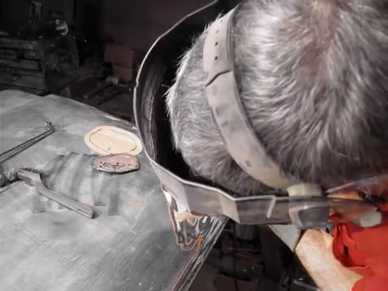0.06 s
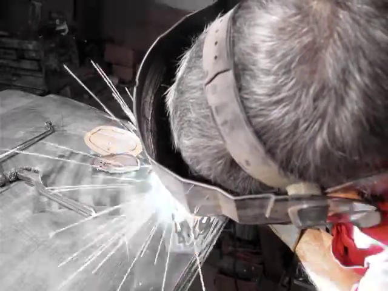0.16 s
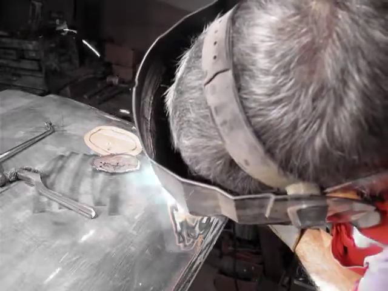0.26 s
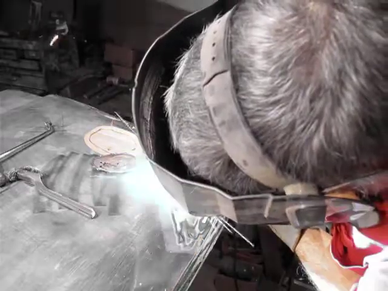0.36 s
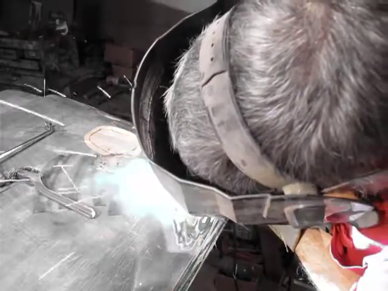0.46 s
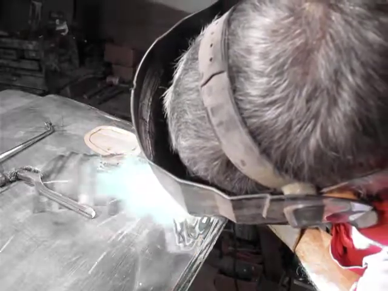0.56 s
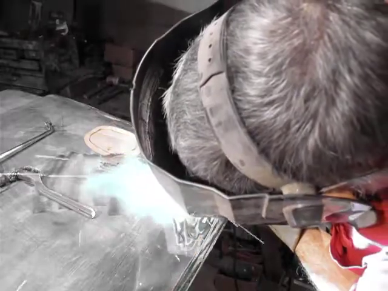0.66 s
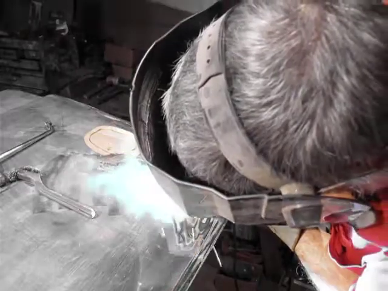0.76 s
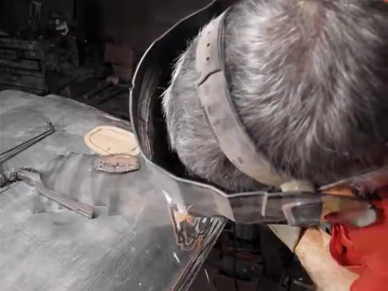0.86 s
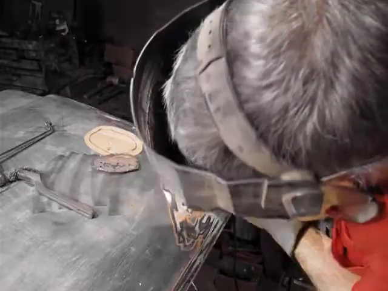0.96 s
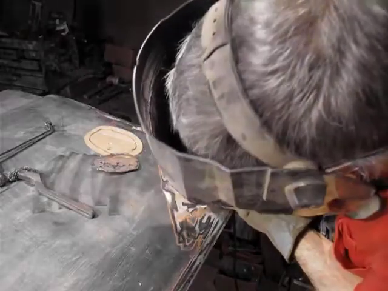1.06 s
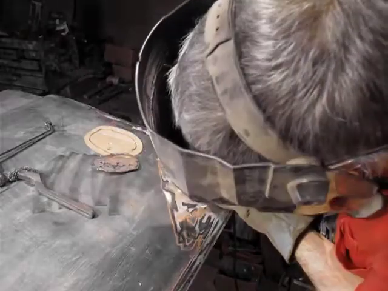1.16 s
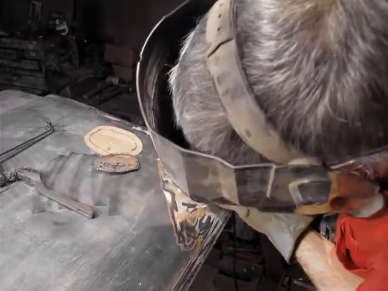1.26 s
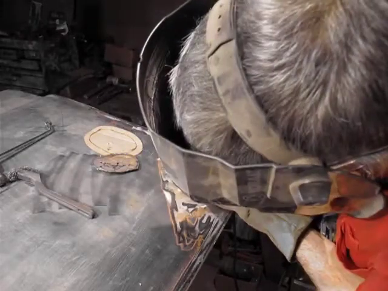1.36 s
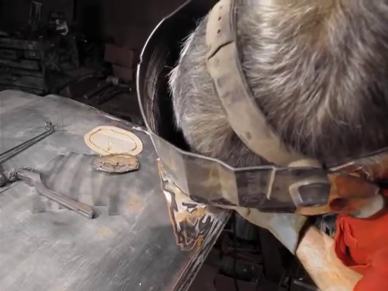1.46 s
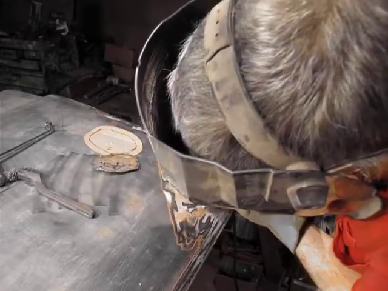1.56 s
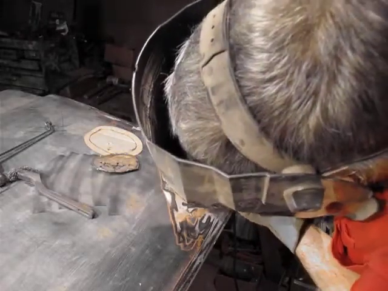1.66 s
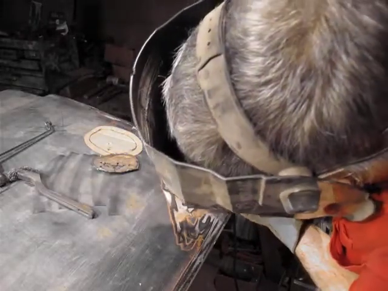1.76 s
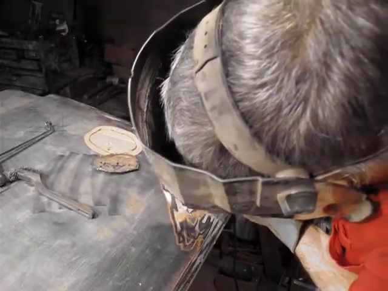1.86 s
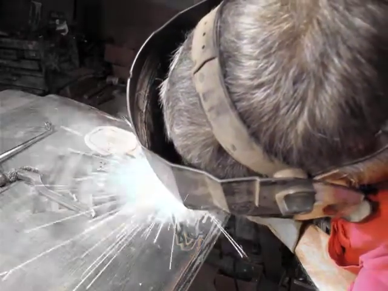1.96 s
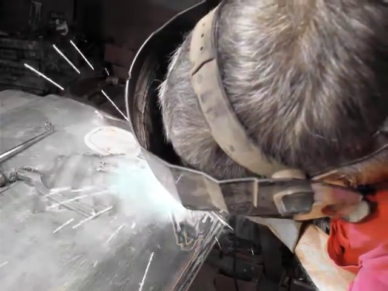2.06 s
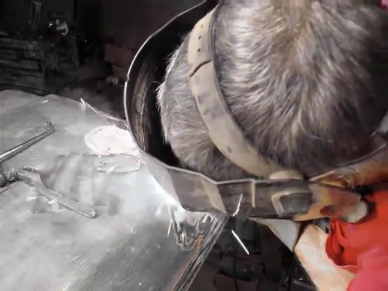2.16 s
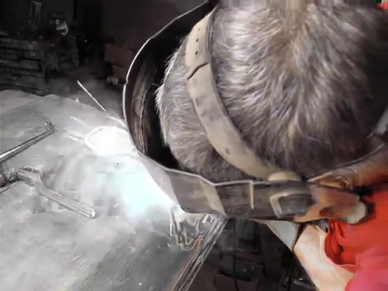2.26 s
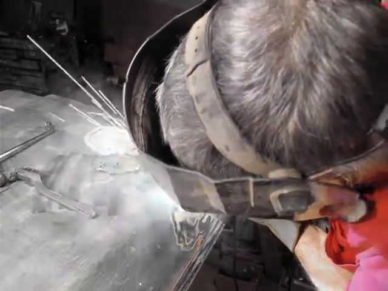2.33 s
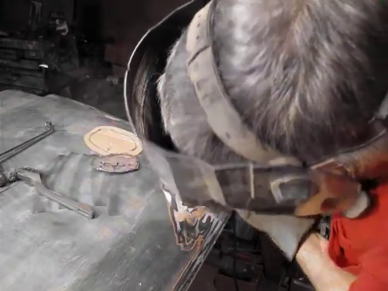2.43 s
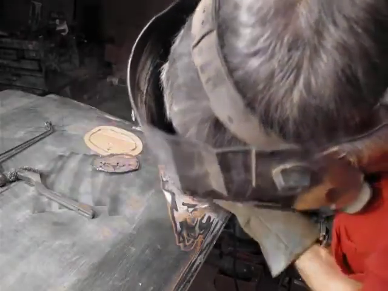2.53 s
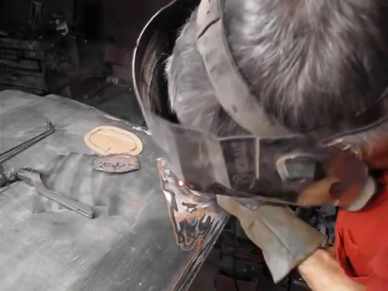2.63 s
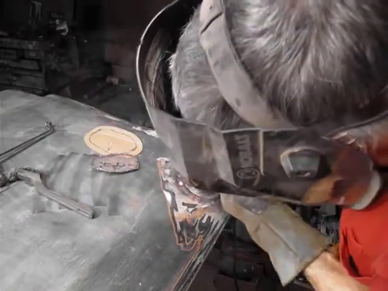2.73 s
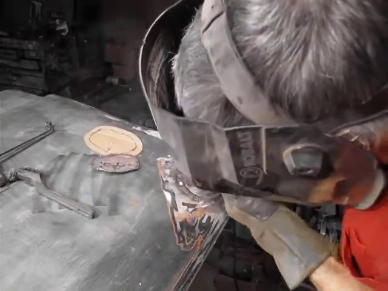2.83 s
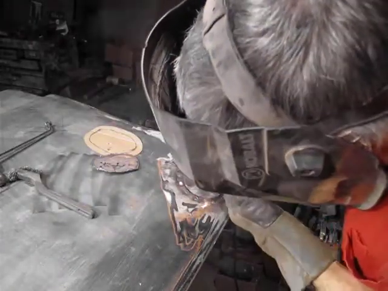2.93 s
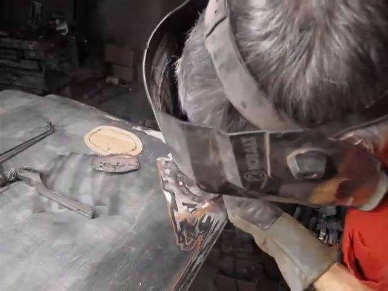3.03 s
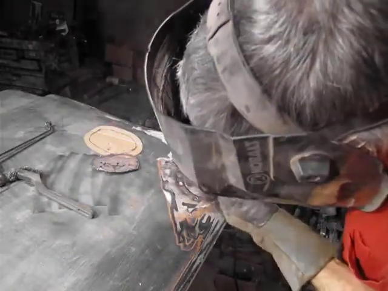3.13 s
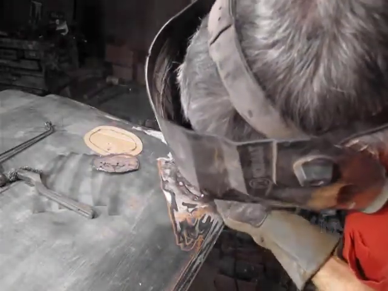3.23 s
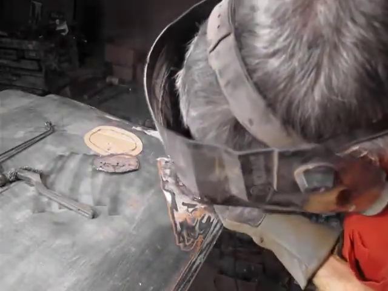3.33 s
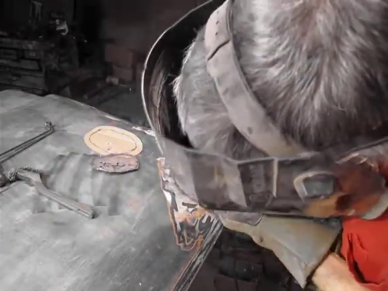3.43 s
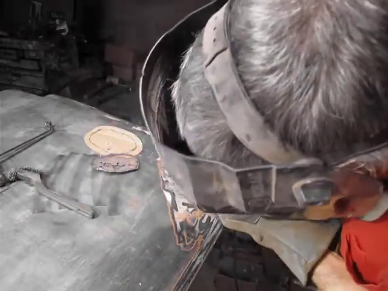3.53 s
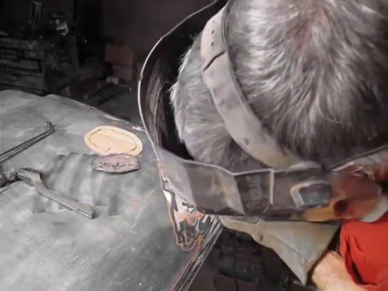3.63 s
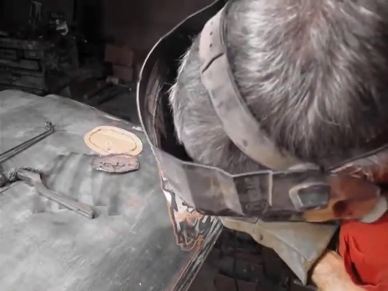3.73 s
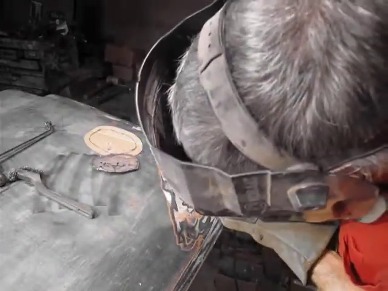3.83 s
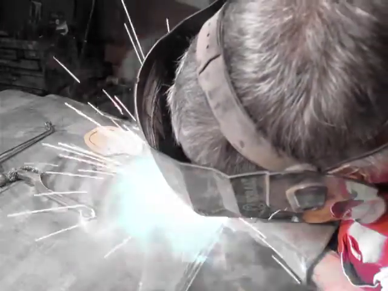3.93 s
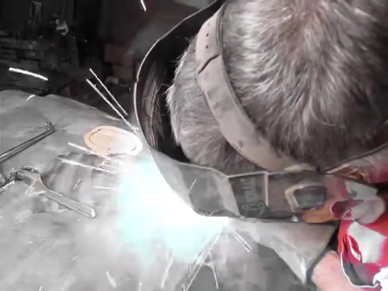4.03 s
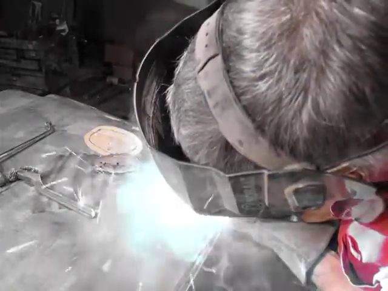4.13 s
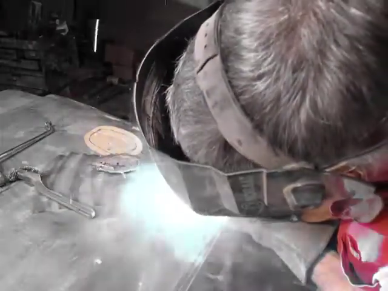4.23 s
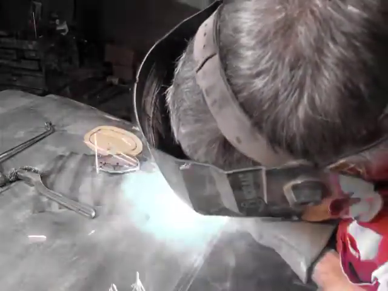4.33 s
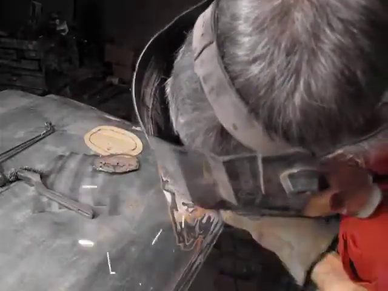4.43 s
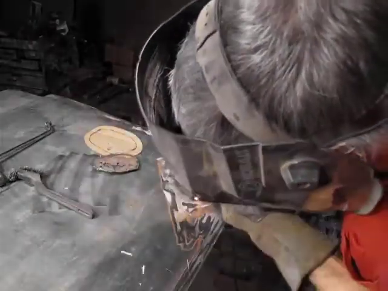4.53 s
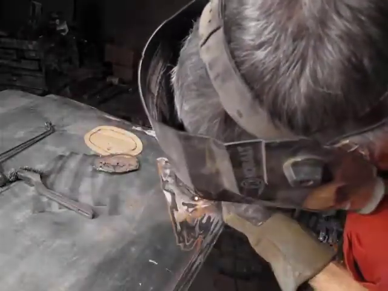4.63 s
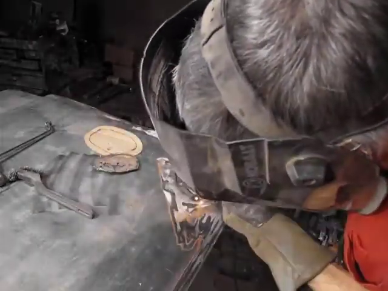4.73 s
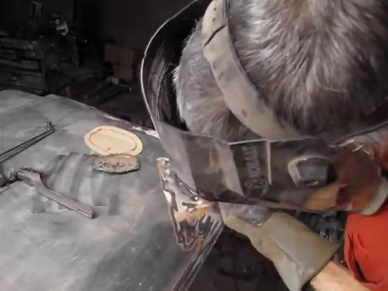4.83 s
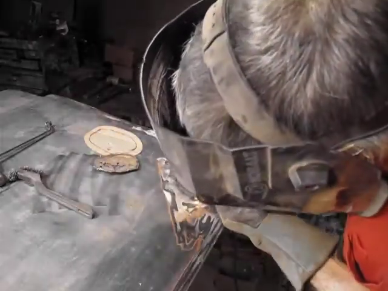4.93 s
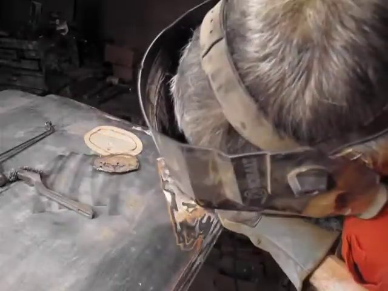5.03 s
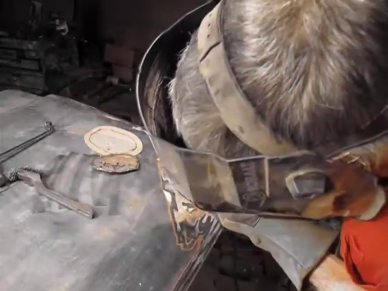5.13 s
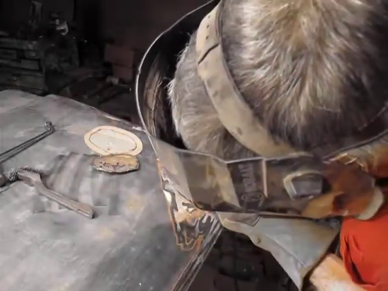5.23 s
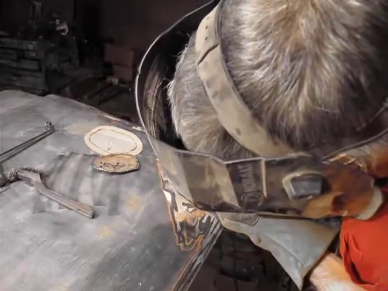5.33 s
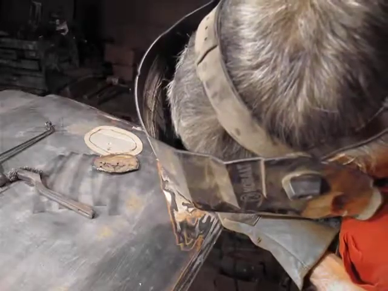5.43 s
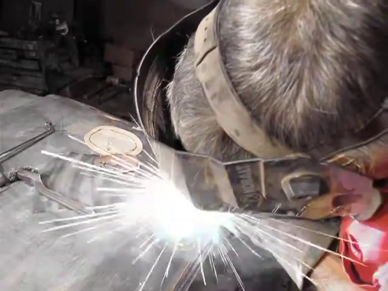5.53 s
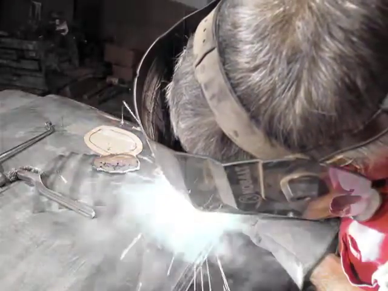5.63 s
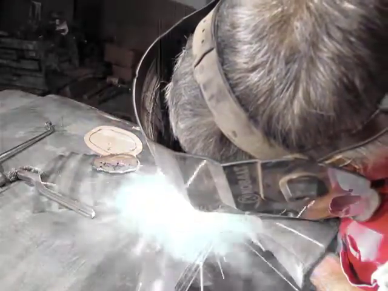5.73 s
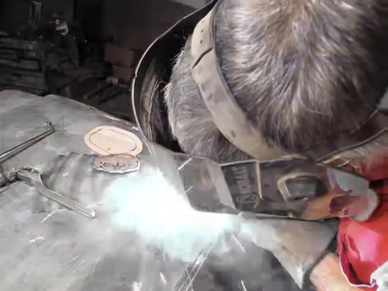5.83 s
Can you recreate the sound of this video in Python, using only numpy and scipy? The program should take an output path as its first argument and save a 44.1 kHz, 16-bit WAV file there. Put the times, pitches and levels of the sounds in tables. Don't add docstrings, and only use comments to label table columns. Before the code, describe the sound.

Arc welding on sheet steel, heard close through a small, bright microphone with automatic gain. The first tack is uneven and stuttering, the second a fast buzzing crackle, the third has heavy, loud cracks with a faint metallic ring, and the last is short. Each starts with a puff of gas and a hard pop; between them a low fan hum fades back up in the reverberant shop.

```python
import sys
import numpy as np
from scipy import signal
from scipy.fft import rfft, irfft
from scipy.io import wavfile
from scipy.ndimage import uniform_filter1d

SR = 44100
rng = np.random.default_rng(int(sys.argv[2]) if len(sys.argv) > 2 else 0)


def waveform_to_disk(signal):
    frames = np.transpose(np.atleast_2d(signal))
    scaled = np.clip(frames, -1, 1) * 32767
    samples = np.round(scaled).astype(np.int16)
    wavfile.write(sys.argv[1], SR, samples)


def gain_from_decibels(decibels):
    exponent = np.asarray(decibels, float) / 20
    return 10 ** exponent


N = 259308
T = np.arange(N) / SR

# f/Hz, width/Hz, level/dB, period/s, on for/s
CHIRPS = [(15640, 250, -74.5, .08405, .058), (12280, 350, -73, .1681, .055)]
# multiple of the blade rate, level/dB
FAN_ORDERS = [(1, -36.5), (2, -58.5), (3, -50.5), (5, -65.5)]
# f/Hz, width/Hz, level/dB
CASE_MODES = [(121, 5.2, -65), (356, 9.1, -57.5), (534, 13, -59), (764, 4.4, -58.5), (813.6, 9.8, -50),
              (998, 18, -54.5), (1055, 3.3, -53.5), (1110, 23, -77), (1197, 12.5, -54), (2760, 430, -60)]
# f/Hz, density/dB per Hz
AIR_SPECTRUM = [(25, -45.5), (80, -41.5), (120, -40), (157, -30), (200, -16.5), (280, -28.5), (425, -23),
                (800, -25.5), (1180, -22.5), (2460, -33.5), (5000, -39.5), (9600, -40), (11200, -48),
                (15000, -68)]
# f/Hz, t60/s
REVERBERATION = [(500, 0.44), (2000, 0.35), (6000, 0.33), (10000, 0.27), (14000, 0.29)]
# f/Hz, gain/dB
DIFFUSE_COLOUR = [(300, -30), (1000, -19.5), (2200, -12.5), (3700, -16.5), (5500, -7.5), (6900, -7),
                  (7800, -8.5), (10200, 3.5), (11400, -8.5), (12500, -17), (15800, -20.5)]
PATH_DELAYS_MS = (0, .29, .68, .97, 2.3, 4.78, 4.99, 5.09, 5.8, 6.06, 15.4)
PATH_SHARES = (1, .65, .28, .2, .08, .8, .6, .32, -.3, .35, .22)
TRIGGERS_S = [
    .1107,
    1.8196,
    3.7867,
    5.4543,
]
# steady arc from t/s, trigger let go t/s, gas puff level/dB, gas flow level/dB, sizzle level/dB
WELDS = [
    (0.334, 0.738, -22.5, -48, -32),
    (1.938, 2.268, -27.5, -32, -30),
    (3.908, 4.218, -25, -33, -37),
    (5.631, 5.9, -25.5, -33, -35),
]
# f/Hz, density/dB per Hz
GAS_SPECTRUM = [(880, -40), (1500, -26), (2100, -18), (2900, -17), (4500, -25), (6140, -29), (6770, -21),
                (7700, -16), (9940, -8.5), (11900, -10.5), (14200, -17), (15800, -25.5)]
# f/Hz, density/dB per Hz
SIZZLE_SPECTRUM = [(800, -29.5), (2000, -7.5), (3700, -18), (5500, -9), (6900, -11.5), (7800, -17),
                   (10200, 2.5), (11400, -6.5), (12500, -15), (15800, -20)]
# f/Hz, width/Hz, level/dB
SHEET_MODES = [(1050, 5, -24)]
# from t/s, to t/s
SHEET_FREE_S = (4.1, 4.3)
STRIKES_S = [
    .1318,
    .2698,
    .3384,
    1.8811,
    1.9323,
    3.8616,
    4.2871,
    5.5094,
    5.6575,
]
# spit level/dB, thump level/dB, blow into the shop level/dB
STRIKE_LEVELS = [(-24, -35, -16), (-14.5, -25, -12), (-17, -11.5, -10), (-17.5, -26, -18),
                 (-20, -12.5, -23), (-14.5, -4, -38), (-28, -22, -15.5), (-9.5, -5.5, -43), (-12, -41, -22)]
STRIKE_CRACKS_DB = (-3, -6, -4, -4.5, -4.5, -1, -8, -2, -3)
# t/s, peak level/dB
LONE_CRACKS = [(.2, -22), (.4209, -17), (.4791, -12), (.5061, -13), (.513, -9), (.5211, -12), (.5561, -12),
               (.7222, -11), (.7323, -13), (.7507, -9), (2.2161, -11), (3.9082, -11), (3.922, -6),
               (3.9894, -6), (5.577, -17), (5.6411, -9)]
# first t/s, last t/s, re-strikes per s, peak level/dB
RUNS = [(.361, .3761, 66, -12), (.3968, .414, 58, -7), (.4395, .4717, 62, -8), (.5713, .6211, 60, -8),
        (.6382, .6739, 56, -14), (.6915, .7098, 55, -11), (1.9431, 2.0548, 125, -13.5),
        (2.0689, 2.1788, 127, -14), (2.1904, 2.2473, 70, -17), (2.2674, 2.2874, 100, -14),
        (3.9387, 3.9813, 70, -11), (4.0063, 4.0457, 76, -11), (4.0605, 4.1216, 65, -11),
        (4.1433, 4.2285, 59, -10.5), (5.6729, 5.7308, 69, -10), (5.7358, 5.8105, 54, -9),
        (5.8333, 5.8524, 52, -8)]
# f/Hz, gain/dB
CRACK_COLOUR = [(40, -42), (200, -24), (600, -11), (1500, -5), (2800, -6), (4300, -10), (7000, -1),
                (7800, -11), (8800, -3), (10000, 0), (11200, -5), (12700, -11), (15500, -14)]
STRIKE_DIVES_DB = (-12, -17.5, -20, -18.5, -22, -23, -19.5, -27.5, -21)
ARC_DIVES_DB = (-22, -26, -23, -23)
# t/s, level/dB
SPUTTERING = (5.577, -16.5)


def level(x, db):
    return x * gain_from_decibels(db) / np.sqrt(np.mean(x ** 2))


def response(table, size=2048):
    hz, db = np.transpose(table)
    log_hz = np.log(np.fft.rfftfreq(size, 1 / SR) + 1)
    log_gain = np.log(gain_from_decibels(np.interp(log_hz, np.log(hz), db)))
    cepstrum = irfft(log_gain)
    cepstrum[1:size // 2] *= 2
    cepstrum[size // 2 + 1:] = 0
    return irfft(np.exp(rfft(cepstrum)))


def unit(table):
    colour = response(table)
    return colour / np.abs(colour).max()


def through(x, impulse):
    return signal.fftconvolve(x, impulse)[:len(x)]


def noise(table):
    return level(through(rng.standard_normal(N), response(table)), 0)


def resonate(x, hz, width):
    return signal.lfilter(*signal.iirpeak(hz, hz / width, fs=SR), x)


def walk(rate):
    k = int(SR / rate)
    held = np.repeat(rng.standard_normal(N // k + 1), k)
    return 1.295 * uniform_filter1d(uniform_filter1d(held, k), k)[:N]


def scatter(s, shapes):
    length = shapes.shape[1]
    x = np.zeros(N + length)
    starts = np.round(np.array(s) * SR).astype(int)
    np.add.at(x, starts[:, None] + np.arange(length), shapes)
    return x[:N]


def camera():
    chirps = 0
    for hz, width, db, period, on in CHIRPS:
        gate = 1. * ((T - .012) % period < on)
        hiss = level(resonate(rng.standard_normal(N), hz, width), db)
        chirps = chirps + hiss * uniform_filter1d(gate, size=300)
    return chirps


def fan():
    blade_hz, motor_hz = 213.9, 197.1
    drift = 1 + .002 * walk(3) + .002 * walk(15)
    phase = 2 * np.pi * np.cumsum(blade_hz * drift) / SR
    tones = gain_from_decibels(-50 + walk(3.4)) * np.sin(phase * motor_hz / blade_hz)
    for order, db in FAN_ORDERS:
        tones = tones + gain_from_decibels(db + 1.07 * order * walk(10)) * np.sin(order * phase)
    hum = 0
    for hz, width, db in CASE_MODES:
        hum = hum + level(resonate(rng.standard_normal(N), hz, width), db)
    air = gain_from_decibels(-40.5 + 0.29 * walk(8)) * noise(AIR_SPECTRUM)
    return 2 ** .5 * tones + hum + air


def room(x):
    onset_s, early_s, early_gain = 0.0046, 0.008, 1.4
    t = np.arange(SR) / SR
    hz, t60 = np.transpose(REVERBERATION)
    tail = 0
    for lo in 125 * 2. ** np.arange(0, 7.5, .5):
        hi = min(lo * 2 ** .5, .49 * SR)
        band = signal.butter(2, [lo, hi], "band", fs=SR, output="sos")
        fade = gain_from_decibels(-60 * t / np.interp(np.log(lo), np.log(hz), t60))
        tail = tail + signal.sosfilt(band, rng.standard_normal(SR)) * fade
    tail = tail * (t > onset_s) * (1 + early_gain * np.exp(-t / early_s))
    return through(x, tail / np.sqrt(np.sum(tail ** 2)))


def bounces(x):
    hz = np.fft.rfftfreq(N, 1 / SR)
    thin = hz / np.hypot(hz, 3000)
    paths = 0
    for ms, share in zip(PATH_DELAYS_MS, PATH_SHARES):
        delay = np.exp(-2j * np.pi * hz * ms / 1000)
        paths = paths + share * delay * (thin if ms else 1)
    return irfft(rfft(x) * paths, N)


def gas():
    puff_s, valve_s, closing_s = 0.022, 0.0014, 0.04
    flow = 0
    for start, (_, off, puff_db, flow_db, _) in zip(TRIGGERS_S, WELDS):
        since = np.clip(T - start, 0, None)
        puff = np.exp(-since / puff_s) + 0.16 * np.exp(-since / valve_s)
        closing = np.exp(-np.clip(T - off, 0, None) / closing_s)
        flow = flow + (T >= start) * (gain_from_decibels(puff_db) * puff + gain_from_decibels(flow_db) * closing)
    return noise(GAS_SPECTRUM) * flow * gain_from_decibels(0.29 * walk(500))


def sizzle():
    burn = 0
    for on, off, *_, db in WELDS:
        dying = np.exp(-np.clip(T - off, 0, None) / 0.055)
        burn = burn + gain_from_decibels(db) * (T > on) * dying
    return noise(SIZZLE_SPECTRUM) * burn * gain_from_decibels(2.5 * walk(640) + walk(30))


def sheet(x):
    free_from, free_to = SHEET_FREE_S
    x = x * (T > free_from) * (T < free_to)
    return sum(gain_from_decibels(db) * resonate(x, hz, width) * (SR / width) ** .5 for hz, width, db in SHEET_MODES)


def thumps():
    t = np.arange(2000) / SR
    push = np.exp(-t / 0.00015) + 0.026 * np.exp(-t / 0.00049) * np.cos(2 * np.pi * 60 * t)
    return scatter(STRIKES_S, gain_from_decibels(np.array(STRIKE_LEVELS)[:, 1:2]) * push)


def steps():
    tick_s, tick_db = .0016, -18
    sputter_s, sputter_db = .0043, -21
    jitter, scatter_db = .045, 2.3
    rows = list(LONE_CRACKS)
    rows += [(s + tick_s, tick_db) for s in TRIGGERS_S]
    rows += list(zip(STRIKES_S, STRIKE_CRACKS_DB))
    rows += [(s - sputter_s, sputter_db) for s in STRIKES_S]
    for first, last, rate, db in RUNS:
        s = np.linspace(first, last, 1 + round((last - first) * rate))
        late, loud = rng.standard_normal((len(s), 2)).T
        rows += list(zip(s + jitter / rate * late, db + scatter_db * loud))
    s, db = np.transpose(rows)
    return scatter(s, gain_from_decibels(db)[:, None])


def cracks(pulses):
    t = np.arange(300) / SR
    burst = np.exp(-(t / 0.0013) ** 4) + 0.15 * np.exp(-t / 0.0026)
    grains = rng.standard_normal((len(STRIKES_S), 300))
    spit = scatter(STRIKES_S, gain_from_decibels(np.array(STRIKE_LEVELS)[:, :1]) * burst * grains)
    return through(gain_from_decibels(4.8) * pulses + spit, unit(CRACK_COLOUR))


def gain_control():
    puff_dive_db, dive_s, climb_db_per_s = -7.5, 0.012, 190
    arc_lag_s, arc_hold_s = 0.011, 0.013
    loud = [(s, s, puff_dive_db) for s in TRIGGERS_S]
    loud += [(s, s, db) for s, db in zip(STRIKES_S, STRIKE_DIVES_DB)]
    loud += [(on + arc_lag_s, off + arc_hold_s, db) for (on, off, *_), db in zip(WELDS, ARC_DIVES_DB)]
    loud += [(SPUTTERING[0], *SPUTTERING)]
    dives = []
    for on, off, db in loud:
        fall = db * np.clip((T - on) / dive_s, 0, 1)
        climb = climb_db_per_s * np.clip(T - off - dive_s, 0, None)
        dives.append(fall + climb)
    return gain_from_decibels(np.minimum(np.min(dives, axis=0), 0))


def echo_duck():
    return gain_from_decibels(-4.5 * sum((T > s + .003) * (T < s + .009) for s in STRIKES_S))


def scene():
    gain, flow, pulses = gain_control(), gas(), steps()
    blows = pulses + scatter(STRIKES_S, gain_from_decibels(np.array(STRIKE_LEVELS)[:, 2:]))
    blows = blows / np.interp(T + .012, T, gain)
    tail = room(gain_from_decibels(1.5) * through(blows, unit(DIFFUSE_COLOUR)) + gain_from_decibels(-21) * flow)
    background = gain * (camera() + fan() + sheet(blows))
    echoing = echo_duck() * (bounces(cracks(pulses) + gain * flow) + gain * tail)
    return (background + sizzle() + thumps() + echoing)[None]


def roll_off(x):
    return signal.sosfilt(signal.butter(12, 16970, fs=SR, output="sos"), x)


def record(dry):
    ceiling, notch_hz, notch_width_hz, top_hz = .62, 11760, 600, 15780
    x = ceiling * np.tanh(dry / ceiling)
    x = signal.lfilter(*signal.iirnotch(notch_hz, notch_hz / notch_width_hz, fs=SR), x)
    x = signal.sosfiltfilt(signal.ellip(8, .2, 27, top_hz, fs=SR, output="sos"), x)
    return roll_off(x)


dry = scene()
out = record(dry)
waveform_to_disk(out)
```